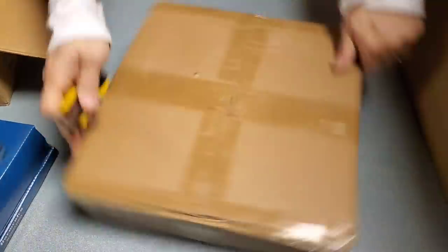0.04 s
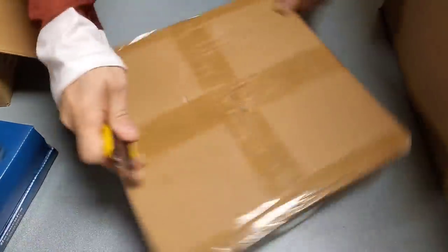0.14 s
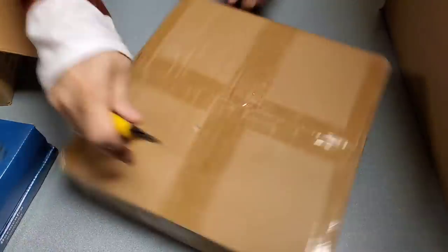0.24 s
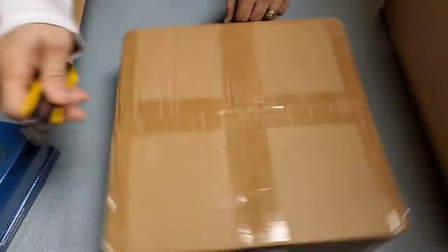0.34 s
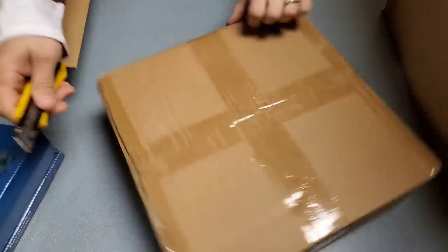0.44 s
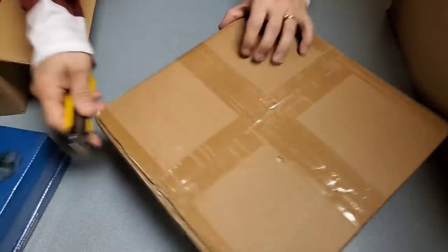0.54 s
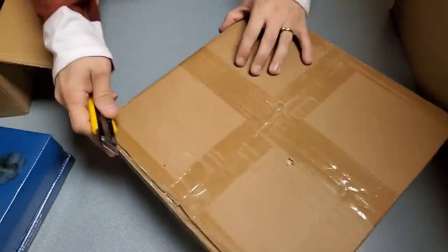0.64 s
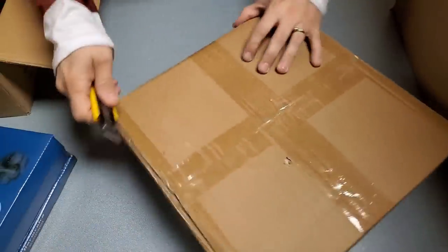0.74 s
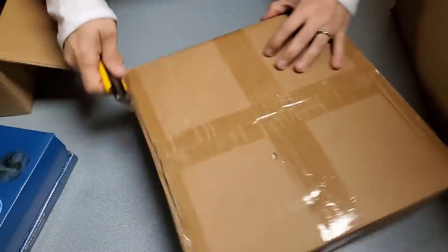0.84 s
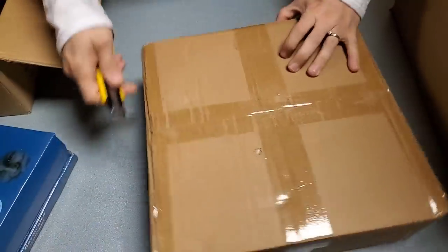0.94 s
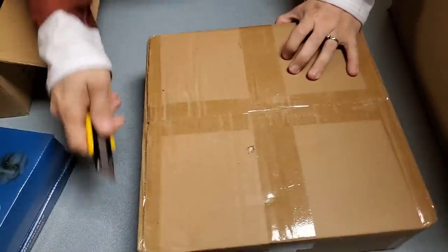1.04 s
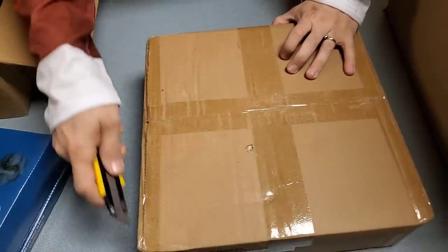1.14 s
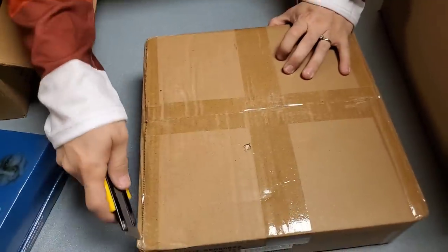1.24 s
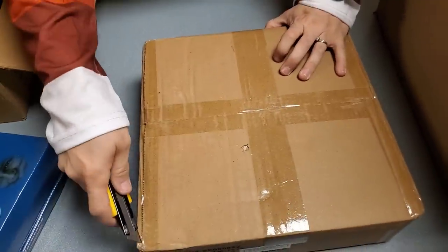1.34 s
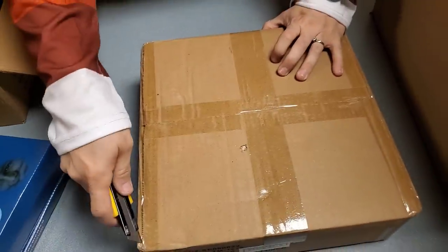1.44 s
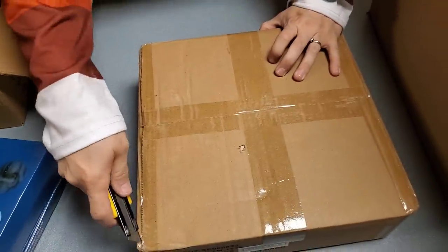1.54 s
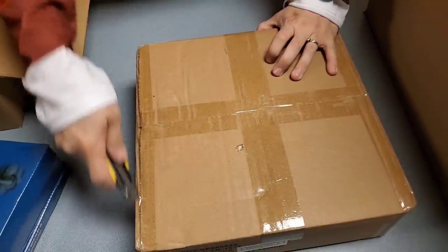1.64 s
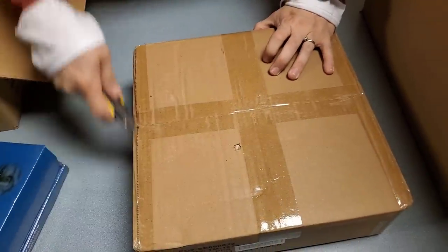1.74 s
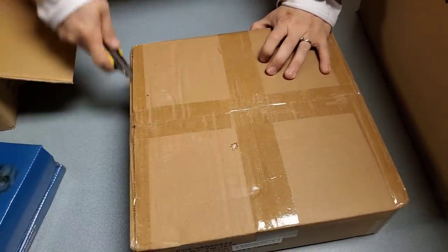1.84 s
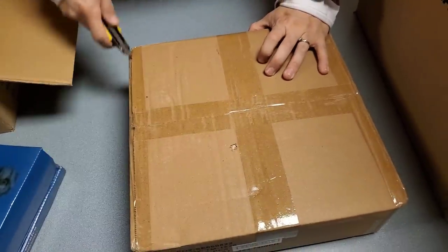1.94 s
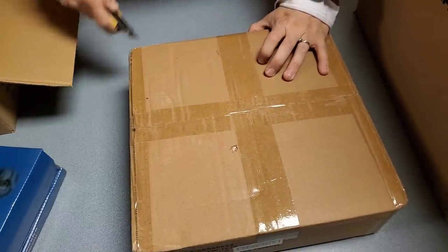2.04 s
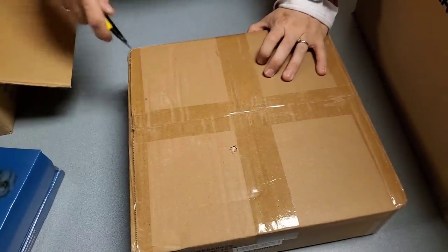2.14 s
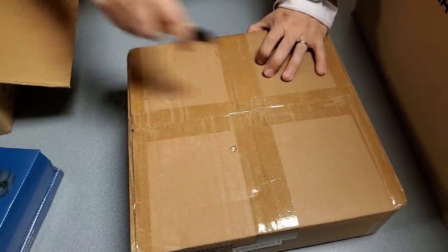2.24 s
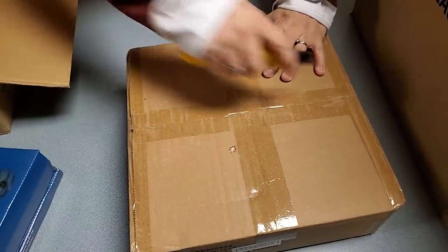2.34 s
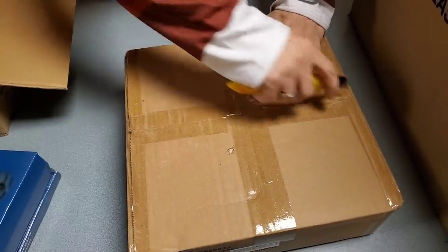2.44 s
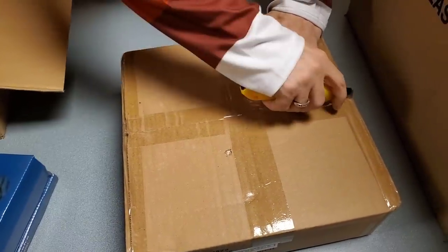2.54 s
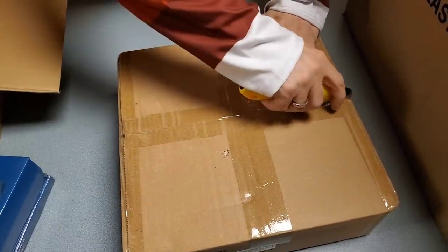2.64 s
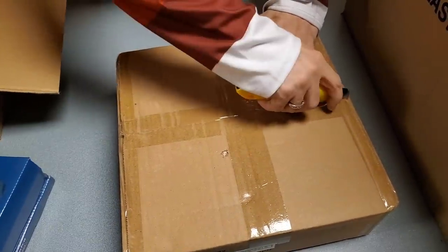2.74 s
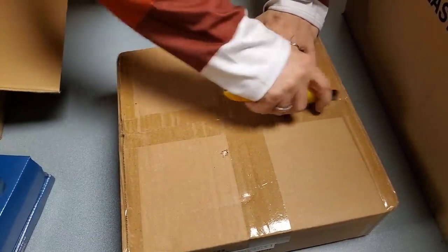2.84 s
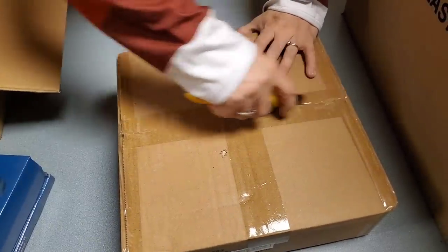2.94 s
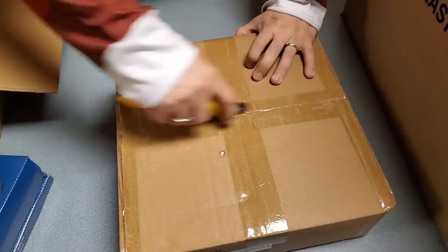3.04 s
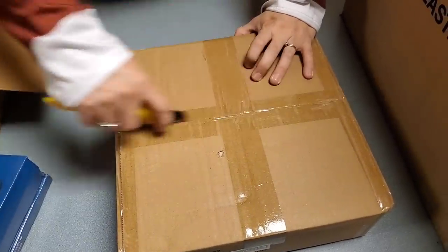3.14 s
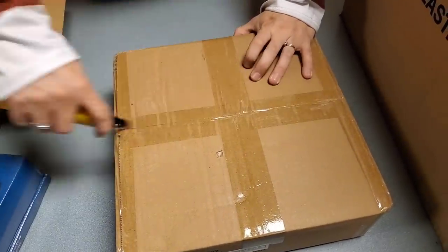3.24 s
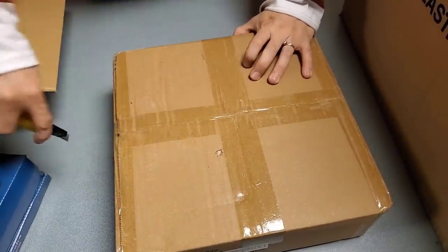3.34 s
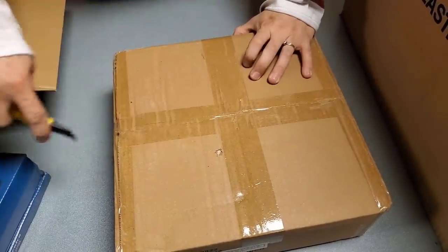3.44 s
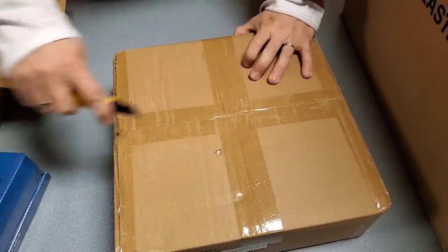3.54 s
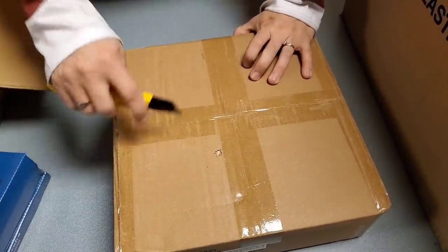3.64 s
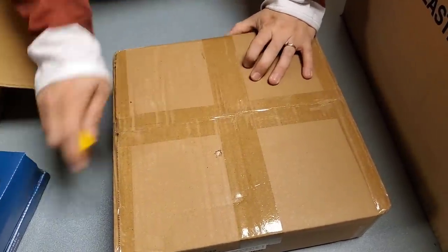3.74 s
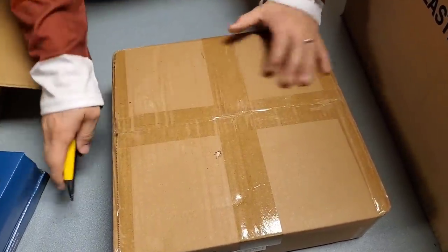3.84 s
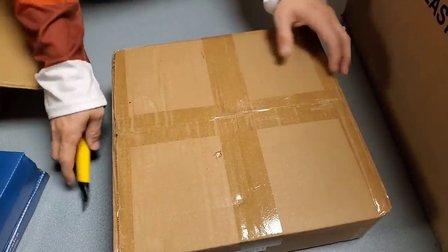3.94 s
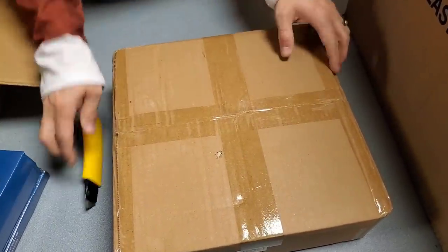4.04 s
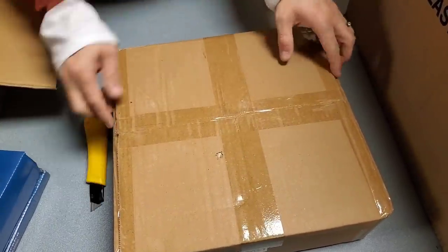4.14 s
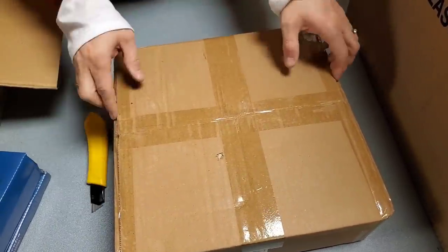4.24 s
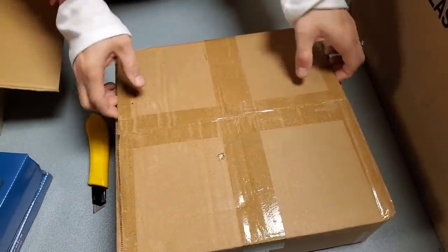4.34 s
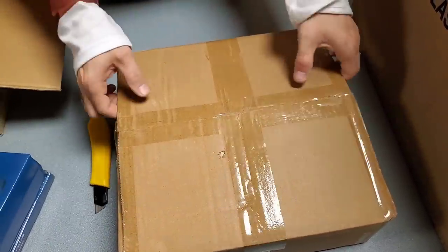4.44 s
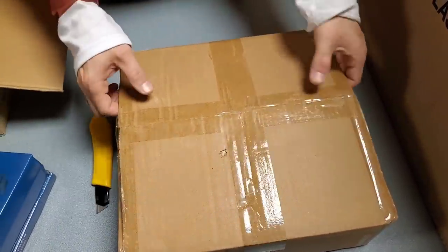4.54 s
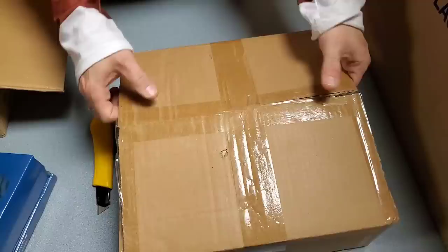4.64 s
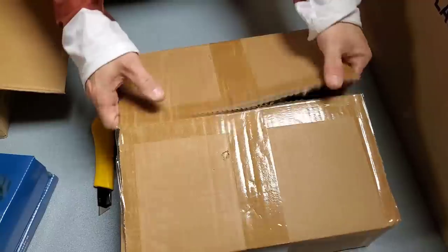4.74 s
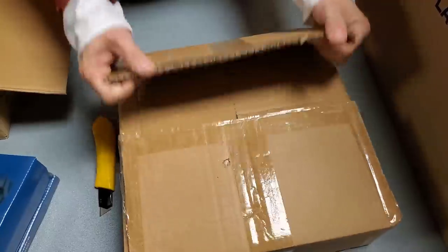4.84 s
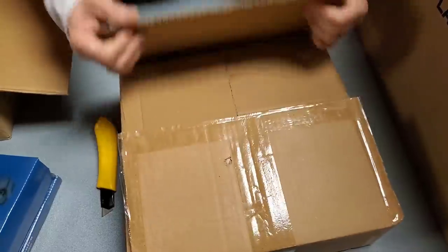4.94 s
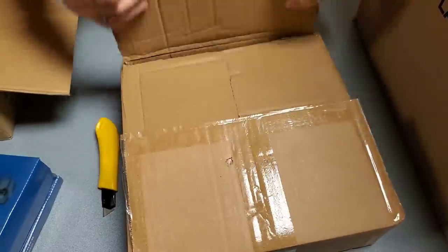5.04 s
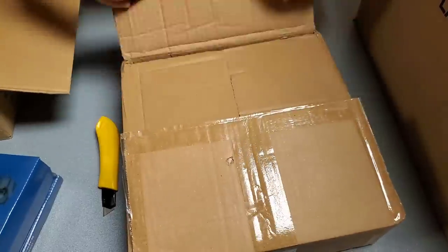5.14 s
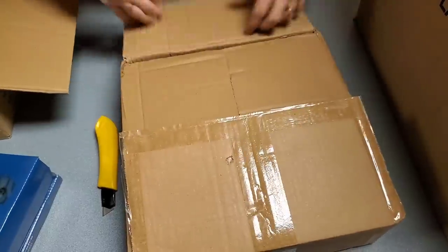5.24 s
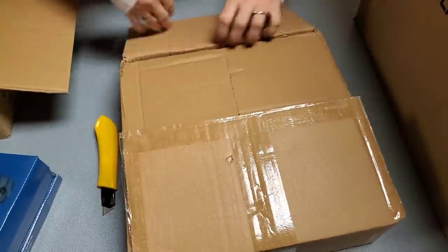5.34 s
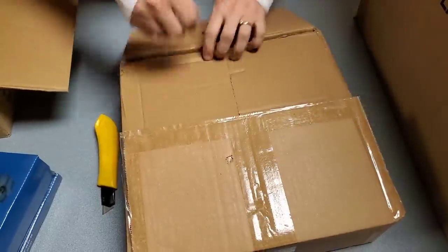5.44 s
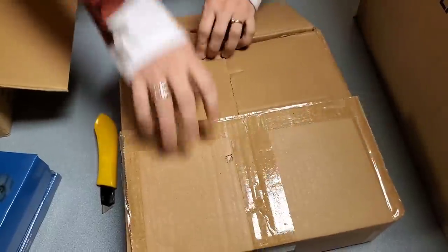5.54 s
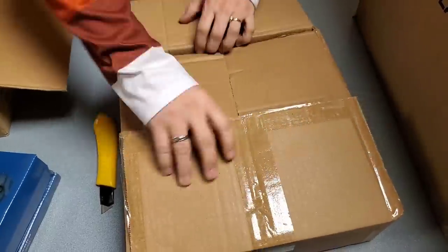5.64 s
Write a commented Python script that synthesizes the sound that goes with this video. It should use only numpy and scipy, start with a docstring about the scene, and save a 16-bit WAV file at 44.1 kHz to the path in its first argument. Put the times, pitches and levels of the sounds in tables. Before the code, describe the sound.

A heavy cardboard box scrapes and bumps across a table, a cutter rasps through tape twice, then tape pops and a flap rips open.

```python
"""Heavy cardboard hisses and bumps over a table, two cuts rasp through tape, tape pops and a flap rips free.
Close by in a small damped room, a box is swung round and pushed: friction noise, shaken walls and rumble.
A cutter slits one edge, then the top seam, where the blade bumps over the flutes: grainy noise and kicked modes.
Fingers pop the last tape in short noise bursts; a flap rips, thuds as damped swings, and is rubbed and folded back."""
import sys
import numpy as np
from scipy import signal
from scipy.fft import rfft, irfft, next_fast_len
from scipy.io import wavfile
from scipy.ndimage import uniform_filter1d

SR = 44100
rng = np.random.default_rng(int(sys.argv[2]) if len(sys.argv) > 2 else 0)


def unload_audio(sound):
    """Save the sound as a 16-bit wav file, at the path given as the first command line argument."""
    columns = np.transpose(np.atleast_2d(sound))
    # keep every value between -1 and 1, then stretch to whole-number steps
    steps = np.round(np.clip(columns, -1, 1) * 32767)
    wavfile.write(sys.argv[1], SR, steps.astype(np.int16))


N = 250047
TIME = np.arange(N) / SR

# modes of the cardboard panels: (frequency [Hz], width [Hz], relative level [dB])
PANEL_MODES = [(111, 88, 0), (241, 61, 1.5), (373, 47, 2.5), (483, 73, -3), (591.6, 60, 2.5),
               (787, 580, -9), (1103, 30, -14.5)]
# modes of the side wall: (frequency [Hz], width [Hz], relative level [dB])
WALL_MODES = [(182, 110, -5), (274, 48, -3), (362, 35, -2), (472, 87, -2.5), (587, 70, 1.5),
              (650, 270, -9.5), (1078, 28, -8.5)]
# higher resonances of the stiff board: (frequency [Hz], width [Hz], boost [dB])
BOARD_PEAKS = [(1110, 50, 3.5), (1210, 140, 3.5), (1600, 50, 2), (1910, 180, 0), (2165, 57, 1.5),
               (2960, 23, 4.5), (3870, 50, -1.5), (4830, 52, 2.5)]


def from_db(db):
    """Decibels to gain."""
    return 10 ** (np.asarray(db) / 20)


def rms_one(x):
    """Scale to unit rms."""
    return x / np.sqrt(np.mean(x ** 2) + 1e-20)


def in_time(rows, fade_s=0.0017):
    """The dB columns of a curve as gains, faded out at its ends."""
    s, *columns = np.transpose(rows)
    gate = np.clip(np.minimum(TIME - s[0], s[-1] - TIME) / fade_s + .5, 0, 1)
    return np.array([gate * from_db(np.interp(TIME, s, c)) for c in columns])


def stroke(full_s, until_s, attack_s, release_s):
    """Gain of one movement: a straight rise, a hold, then a fall of 60 dB per release time."""
    rise = np.clip(1 + (TIME - full_s) / attack_s, 0, 1)
    return rise * from_db(-60 * np.maximum(TIME - until_s, 0) / release_s)


def strokes(rows):
    """Gains of rasp, panel and fizz for a run of movements; a bright one trades panel for fizz."""
    power = 0
    for full_s, until_s, db, attack_s, release_s, bright_db in rows:
        gains = from_db([db, db - bright_db, db + bright_db])
        power = power + np.outer(gains, stroke(full_s, until_s, attack_s, release_s)) ** 2
    return np.sqrt(power)


def colour(x, points, share=1):
    """Shape a sound by a smooth spectrum of (frequency [Hz], level [dB]), its dB scaled by share."""
    size = next_fast_len(x.shape[-1] + 2048)
    hz, db = np.transpose(points)
    bins = np.maximum(np.arange(size // 2 + 1) * SR / size, 1)
    gain = from_db(share * np.interp(np.log(bins), np.log(hz), db))
    return irfft(rfft(x, size) * gain, size)[..., :x.shape[-1]]


def band(x, low_hz, high_hz, order=2):
    """Causal band-pass."""
    edges = [low_hz, min(high_hz, .45 * SR)]
    return signal.sosfilt(signal.butter(order, edges, "band", fs=SR, output="sos"), x)


def resonance(x, hz, width_hz):
    """One resonance with gain 1 on top."""
    r = np.exp(-np.pi * width_hz / SR)
    numerator = np.array([1, 0, -1]) * (1 - r * r) / 2
    denominator = [1, -2 * r * np.cos(2 * np.pi * hz / SR), r * r]
    return signal.lfilter(numerator, denominator, x + 1e-18)


def body(x, modes):
    """Parallel resonances with alternating signs."""
    return sum((-1) ** k * from_db(db) * resonance(x, hz, width) for k, (hz, width, db) in enumerate(modes))


def boosted(x, modes):
    """Narrow peaks and dips on a sound that passes through."""
    for hz, width_hz, db in modes:
        x = x + (from_db(db) - 1) * resonance(x, hz, width_hz)
    return x


def drift(per_s):
    """Smooth chance with rms 1, drawn anew per_s times a second."""
    return rms_one(np.interp(TIME * per_s, np.arange(8192), rng.standard_normal(8192)))


def wander(x, depth, per_s):
    """As the contact point travels, broad parts of the spectrum swell and fade on their own."""
    return x + sum(depth * drift(per_s) * resonance(x, hz, hz / 3) for hz in np.geomspace(900, 13000, 9))


def grains(per_s, spread_db, clump_db, clump_per_s, smooth):
    """Fibres catch and break in clumps over a smooth friction noise; mid and side."""
    sizes = from_db(abs(spread_db) * np.minimum(rng.exponential(1, N), 4))
    clicks = rms_one(sizes * (rng.random(N) < per_s / SR) * rng.standard_normal((2, N)))
    friction = smooth * rng.standard_normal((2, N))
    return rms_one((clicks + friction) * from_db(clump_db * drift(clump_per_s)))


def scrape(force, gains, tone, modes, rasp_db, panel_db, fizz_db, split_hz=5000):
    """Friction sounds directly as rasp and fizz, and shakes the panels."""
    direct = wander(boosted(colour(force, tone), BOARD_PEAKS), depth=0.26, per_s=32)
    rasp = from_db(rasp_db) * rms_one(band(direct, 700, split_hz, order=3))
    fizz = from_db(fizz_db) * rms_one(band(direct, split_hz, SR, order=3))
    panel = from_db(panel_db) * rms_one(body(force, modes))
    return gains[0] * rasp + gains[1] * panel + gains[2] * fizz


def room_quiet(level_db=-73.5):
    """A faint steady noise with a coloured spectrum lies under everything; mid and side."""
    # (frequency [Hz], relative level [dB])
    quiet_tone = [(18, -36), (30, 0), (114, -0.5), (177, -15), (575, -21.5), (1870, -20), (3880, -22),
                  (6720, -20), (7260, -26), (11600, -19.5), (15500, -27)]
    return from_db(level_db) * rms_one(colour(rng.standard_normal((2, N)), quiet_tone))


def slide(speed, tone, hiss_db, rumble_db, wall_db, rumble_follows=1.0):
    """The underside hisses over the table top, the walls resound and the load rumbles."""
    # low spectrum of the moving load: (frequency [Hz], relative level per Hz [dB])
    rumble_tone = [(18, -40), (30, -2.5), (122, -2.5), (184, -6.5), (235, -5), (368, -16.5), (500, -6.5),
                   (650, -34.5), (1100, -120)]
    force = grains(per_s=8300, spread_db=0.5, clump_db=0.75, clump_per_s=55, smooth=1.3)
    hiss = rms_one(wander(colour(force, tone), depth=0.16, per_s=13.77))
    walls = from_db(wall_db) * rms_one(body(force, WALL_MODES))
    rumble = from_db(rumble_db) * rms_one(colour(force, rumble_tone))
    return from_db(hiss_db) * speed * (hiss + walls) + speed ** rumble_follows * rumble


def sliding_box():
    """The box is swung round, then pushed straight: friction follows the speed of each move."""
    # the two moves: (full speed from [s], until [s], attack [s], release [s])
    swing = (0.12, 0.61, 0.21, 0.81)
    shove = (1.005, 1.08, 0.24, 0.74)
    # hiss spectra of the two moves: (frequency [Hz], relative level per Hz [dB])
    turn_hiss = [(240, -23), (400, -12), (673, -9), (1030, -10.5), (1130, -12), (1710, -3.5), (4090, -8.5),
                 (4920, -11.5), (8930, -10), (10400, -11.5), (11200, -5.5), (15500, -18.5)]
    push_hiss = [(120, -43.5), (200, -11.5), (399, -3), (575, 2), (702, -4), (906, -3.5), (1090, -9.5),
                 (1980, 0.5), (5390, -8), (8660, -8.5), (10400, -9.5), (11600, -5), (14400, -13),
                 (15500, -26.5)]
    return (slide(stroke(*swing), turn_hiss, hiss_db=-33.5, rumble_db=-45, wall_db=-26)
            + slide(stroke(*shove), push_hiss, hiss_db=-39.5, rumble_db=-67, wall_db=-30.5))


def thuds(rattle=.25, cycles_to_60_db=10.6, hollow_hz=140, hollow_db=-7.5, hollow_t60_s=0.19):
    """Soft bumps: a few damped panel swings with dull rattle; the hollow box rings on, most after low blows."""
    # soft blows of box and flap: (time [s], level [dB], pitch [Hz])
    blows = [(0.042, -29, 160.3), (.14, -12.5, 164.5), (.16, -5, 398), (0.177, -20, 110), (.244, -12, 371),
             (.246, -16.5, 59.8), (.259, -21, 122), (0.265, -19.5, 527), (.469, -33.5, 70.6),
             (.513, -18.5, 395), (.53, -36.5, 60), (0.758, -34, 84), (2.274, -42, 604), (4.434, -16.5, 504),
             (4.508, -27.5, 266), (4.545, -29.5, 148.4), (4.706, -14, 197.5), (4.809, -13, 228),
             (4.908, -10, 232), (4.9179, -4.5, 305), (4.922, -6.5, 98.7), (5.346, -26.5, 332),
             (5.475, -16.5, 345)]
    size = SR // 2
    t, out = np.arange(size) / SR, np.zeros((2, N + size))
    contact = 1 - np.exp(-t / .001)
    hollow_decay = from_db(hollow_db - 60 * t / hollow_t60_s)
    hollow = hollow_decay * np.sin(2 * np.pi * hollow_hz * t) * contact * [[1], [0]]   # mid only
    for (s, db, hz), white in zip(blows, rng.standard_normal((len(blows), 2, size))):
        swing = np.sin(2 * np.pi * hz * t) * [[1], [0]] + rattle * rms_one(band(white, hz / 2, hz * 2))
        bump = band(swing * contact * from_db(-60 * t * hz / cycles_to_60_db), hz / 2, hz * 2)
        hollow_share = min(1, hollow_hz / hz) ** 2
        start = int(s * SR)
        out[:, start:start + size] += from_db(db) * (bump + hollow_share * hollow)
    return out[:, :N]


def snaps(rows, rise_s=0.00018, low_hz=900, high_hz=5000, panel_db=-7, ring_db=-3, crack_db=-2):
    """Each snap is a short noise burst: a woody body, a crack that rings at its own pitch, a bright edge."""
    size = SR // 8
    t, out = np.arange(size) / SR, np.zeros((2, N + size))
    for (s, db, bright_db, hz, t60), white in zip(rows, rng.standard_normal((len(rows), 2, size))):
        # a brighter snap has less body and more edge
        body_db, edge_db = -8 - 0.94 * bright_db, -7 + bright_db
        decay = from_db(-60 * t / t60)
        burst = white * (1 - np.exp(-t / rise_s)) * decay
        parts = [(band(burst, 130, low_hz), body_db),
                 (body(burst, PANEL_MODES), body_db + panel_db),
                 (band(boosted(burst, BOARD_PEAKS), low_hz, high_hz), crack_db),
                 (resonance(burst, hz, hz / 5), ring_db),
                 (band(burst, high_hz, 12000), edge_db)]
        energy = np.sum(decay ** 2) * 2.32 / size   # a longer burst carries more energy
        start = int(s * SR)
        for part, part_db in parts:
            level = from_db(db + part_db) * np.sqrt(energy)
            out[:, start:start + size] += level * part / part.std(axis=1, keepdims=True)
    return out[:, :N]


def rubbing():
    """Skin, sleeves and the flap brush over the board as grainy friction."""
    # (full force from [s], until [s], level [dB], attack [s], release [s], brightness [dB])
    rubs = [(1.2, 1.3, -58.5, 0.15, 0.74, 6), (1.46, 1.49, -57, 0.014, 0.21, -1.5),
            (1.66, 1.7, -64.5, 0.18, 0.21, -1), (2.175, 2.18, -55, 0.0069, .25, 1),
            (2.28, 2.3, -68.5, .03, 0.29, -2), (2.7, 2.705, -61.5, 0.044, 0.18, 0.5),
            (2.935, 2.95, -59, 0.081, 0.029, 4), (3.83, 3.88, -67, 0.024, 0.14, 0.5),
            (3.955, 3.965, -52, 0.097, 0.42, 4.5), (4.95, 4.99, -57.5, .02, 0.32, -4),
            (5.15, 5.18, -40.5, 0.14, 0.57, 4), (5.44, 5.49, -42.5, .14, 0.67, 2.5),
            (5.6, 5.63, -52.5, 0.071, 0.23, 0)]
    # (frequency [Hz], relative level per Hz [dB])
    rub_tone = [(410, -35), (700, -1), (797, -10.5), (1340, -4), (1830, 2.5), (3820, -4.5), (6100, -4.5),
                (7220, -8.5), (8760, -4), (10200, -7), (11700, 1.5), (15500, -15)]
    force = grains(per_s=2700, spread_db=2.0, clump_db=2.0, clump_per_s=63, smooth=0.98)
    return scrape(force, strokes(rubs), rub_tone, PANEL_MODES, rasp_db=-2.5, panel_db=0.2, fizz_db=-0.74)


def edge_cut(rasp_db=-1.87, panel_db=-3.5, fizz_db=-4.0, wall_fade_db_per_s=10.5, fizz_growth_db_per_s=10.5):
    """The blade runs through tape and paper along the side, thinner as it nears the stiff corner."""
    # force of the blade, as the level of its rasp: (time [s], level [dB])
    edge_force = [(1.72, -45), (1.764, -26.5), (1.88, -21), (2.018, -28.5), (2.052, -23), (2.09, -34.5),
                  (2.1, -25), (2.16, -27), (2.174, -46.5)]
    # (frequency [Hz], relative level per Hz [dB])
    edge_tone = [(410, -31.5), (700, -1.5), (828, -15), (1070, -8), (1480, -7), (1950, -0.5), (3190, -5.5),
                 (7900, -6), (8990, -4.5), (10400, -7), (11500, -1), (15500, -18)]
    force = grains(per_s=6000, spread_db=0.5, clump_db=1.05, clump_per_s=360, smooth=0.96)
    press, = in_time(edge_force)
    past_middle_s = TIME - (edge_force[0][0] + edge_force[-1][0]) / 2
    wall_gain = press * from_db(-wall_fade_db_per_s * past_middle_s)
    fizz_gain = press * from_db(fizz_growth_db_per_s * past_middle_s)
    return scrape(force, [press, wall_gain, fizz_gain], edge_tone, WALL_MODES, rasp_db, panel_db, fizz_db)


def seam_cut(jitter=.05, bump_spread_db=4.0, throb_db=0.5, blade_hz=3400, blade_db=-33, bite_wall_db=-37,
             flutes_db=-20.0):
    """Each flute kicks the top and tightens the rasp, harder with speed; the blade sings as it bites."""
    # speed of the blade along the seam: (time [s], rate [flutes/s])
    flute_rate = [(3.0, 79.5), (3.1, 105), (3.18, 126.6), (3.24, 131.7), (3.34, 123), (3.45, 86.3)]
    # whole stroke, first bite, and blade sunk in: (full from [s], until [s], attack [s], release [s])
    seam_stroke = (3.02, 3.428, .065, 0.084)
    bite = (3.02, 3.04, 0.033, 0.41)
    sink = (3.1, 3.434, 0.11, 0.054)
    # modes of the top, held down along its seam: (frequency [Hz], width [Hz], relative level [dB])
    top_modes = [(133, 70, -5), (236, 65, 3), (390.3, 16, -5.5), (590, 26, -23.5)]
    # (frequency [Hz], relative level per Hz [dB])
    seam_tone = [(410, -15.5), (700, 1.5), (919, -24), (1020, -1.5), (1630, -1), (2770, 1.5), (3270, -6.5),
                 (3580, -3), (5360, -13.5), (10400, -16.5), (11700, -8), (15500, -27.5)]

    rate = np.interp(TIME, *np.transpose(flute_rate))
    speed, press = rate / rate.max(), stroke(*seam_stroke)
    turns = np.cumsum(rate * (1 + jitter * drift(110))) / SR   # flutes passed so far

    kicks = np.diff(np.floor(turns), prepend=0) * from_db(bump_spread_db * drift(120))
    shaking = kicks * [[1], [0]] + 0.026 * rng.standard_normal((2, N))
    drum = band(body(shaking, top_modes), low_hz=75.7, high_hz=3100)
    drum = drum / np.sqrt(uniform_filter1d(drum[0] ** 2, size=1500) + 1e-12)   # the hand keeps an even pressure
    flutes = from_db(flutes_db) * stroke(*sink) * speed ** 5.4 * drum

    force = grains(per_s=2200, spread_db=2.0, clump_db=1.0, clump_per_s=120, smooth=1.0)
    force = force * from_db(throb_db * np.cos(2 * np.pi * turns))
    # rasp, panel and fizz: dB gained per dB of blade speed
    gains = [press * speed ** follows for follows in (1.76, 2.9, 0.2)]
    rasp = scrape(force, gains, seam_tone, PANEL_MODES, rasp_db=-28, panel_db=-26.5, fizz_db=-32)

    singing = from_db(blade_db) * rms_one(resonance(force, blade_hz, width_hz=800))
    bitten_wall = from_db(bite_wall_db) * rms_one(body(force, WALL_MODES))
    return rasp + stroke(*bite) * (singing + bitten_wall) + flutes


def tape():
    """Strained tape crackles against the side wall as fingers pull, and rips in dense bursts."""
    # fingers pull, tape rips: (full force from [s], until [s], level [dB], attack [s], release [s],
    # brightness [dB])
    pulls = [(4.207, 4.33, -42, .004, 0.66, -3.5), (4.283, 4.29, -31.5, 0.011, 0.28, 0),
             (4.413, 4.432, -34, .004, 0.1, 4.5), (4.51, 4.515, -38.5, 0.042, 0.22, -3.5),
             (4.536, 4.556, -38, 0.0078, 0.21, 2), (4.64, 4.69, -44, 0.022, 0.33, 1.5),
             (4.707, 4.714, -28, 0.0059, 0.12, 2), (4.78, 4.8, -46, .06, .1, 2)]
    rips = [(4.147, 4.155, -29, 0.00263, 0.25, 2), (4.81, 4.822, -24.5, 0.012, 0.42, 2.5),
            (4.897, 4.922, -19, 0.01, 0.041, 1.5)]
    # (frequency [Hz], relative level per Hz [dB])
    tear_tone = [(410, -20), (700, -1), (968, -14), (1160, -4), (1410, -2.5), (2280, -0.5), (3680, -7),
                 (8760, -12.5), (9850, -15.5), (12000, -9), (14300, -18.5), (15500, -27)]
    crackle = grains(per_s=1200, spread_db=1.0, clump_db=3.5, clump_per_s=220, smooth=0.67)
    tearing = grains(per_s=3600, spread_db=1.2, clump_db=2.0, clump_per_s=200, smooth=0.57)
    return (scrape(crackle, strokes(pulls), tear_tone, WALL_MODES, rasp_db=-0.5, panel_db=0.3, fizz_db=0.0)
            + scrape(tearing, strokes(rips), tear_tone, PANEL_MODES, rasp_db=0.7, panel_db=3.0, fizz_db=-2.0))


def place(mid_side, pan_db):
    """Mid and side to left and right, leaning left by pan_db."""
    # stereo width: (frequency [Hz], side minus mid [dB])
    side_width = [(60, -10), (130, -28.5), (260, -19), (520, -10), (1000, -5), (2000, -0.5), (12000, 0)]
    mid, side = mid_side[0], colour(mid_side[1], side_width)
    return np.array([mid + side, mid - side]) * from_db(np.array([[pan_db], [-pan_db]]) / 2)


def room(x, early_db=-12, early_t60=0.064, late_db=-19, late_t60=0.14):
    """Quick reflections off table and nearby boxes, then a short faint tail, as decaying noise."""
    t = np.arange(SR // 2) / SR
    answer = 0
    for db, t60 in [(early_db, early_t60), (late_db, late_t60)]:
        noise = band(rng.standard_normal((2, len(t))), 200, 14000, order=1)
        echoes = place(noise, pan_db=4.5) * from_db(-60 * t / t60) * (t > .002)
        answer = answer + from_db(db) * rms_one(echoes) / np.sqrt(len(t))
    return x + signal.fftconvolve(x, answer, axes=1)[:, :N]


def scene():
    """All the handling in the room, most parts placed a little left and the cutter ticks a little right, then
    tilted right above a few hundred hertz."""
    # cutter ticks and knocks on the board, then tape and flap snaps:
    # (time [s], level [dB], brightness [dB], ring [Hz], t60 [s])
    tick_rows = [(.243, -34, -9.5, 1360, 0.12), (.8241, -45.5, -13, 3240, 0.012),
                 (1.3328, -46, -7, 1080, 0.013), (1.429, -42.5, 3, 3920, 0.06),
                 (1.4455, -35, 7, 5850, .019), (1.4789, -41, 4.5, 2260, .01),
                 (1.4925, -43, -7.5, 2170, 0.014), (1.6283, -48.5, -3, 1920, 0.017),
                 (1.6544, -49, 3.5, 6350, .014), (1.7112, -37.5, 2, 6410, 0.026),
                 (2.1896, -35, 3.5, 5370, 0.028), (2.245, -44, -1.5, 4160, 0.0088),
                 (2.42, -63.5, 11.5, 6400, .014), (2.6965, -40.5, 7, 4500, 0.017),
                 (2.904, -53.5, -2, 1970, 0.017), (2.932, -41.5, 11, 2060, 0.012),
                 (2.9581, -20.5, -3.5, 1950, 0.015), (3.1031, -22, 2.5, 5037, 0.0097),
                 (3.914, -43, -0.5, 5370, 0.016), (3.9536, -30.5, 7.5, 4930, 0.019)]
    snap_rows = [(4.1305, -26.5, 3, 5460, 0.034), (4.1428, -15, 9, 1700, 0.013),
                 (4.2041, -22.5, -4.5, 1130, 0.015), (4.2344, -23, 1, 1160, 0.011),
                 (4.2497, -29.5, 8.5, 1130, 0.032), (4.2806, -18.5, -3, 1710, 0.011),
                 (4.3147, -29.5, 1, 4870, 0.031), (4.341, -29.5, -10, 1890, 0.013),
                 (4.4119, -24.5, -10, 2190, 0.024), (4.4281, -26.5, -7, 2520, 0.013),
                 (4.4367, -25, -12, 2360, 0.015), (4.459, -34, 11, 2980, .013),
                 (4.4793, -32.5, 5, 2370, 0.02), (4.534, -39, 8, 2160, .014), (4.547, -35, 3, 2200, 0.073),
                 (4.6341, -37, -4, 2140, 0.013), (4.7043, -12, -4, 1650, 0.017),
                 (4.7322, -33, 3, 6850, 0.015), (4.8099, -25.5, -4, 3200, .015),
                 (4.8197, -18, -3, 6760, .035), (4.901, -18, 1, 6850, 0.02),
                 (5.1052, -34, -4.5, 2060, 0.027), (5.1388, -31.5, -3.5, 5900, 0.032),
                 (5.188, -36.5, -4, 3730, 0.017), (5.244, -37, 13.5, 6100, 0.0074),
                 (5.2909, -41.5, 8, 6000, .012), (5.474, -34.5, 1, 1100, 0.012)]
    # tilt between the ears, applied in part: (frequency [Hz], left minus right [dB])
    ear_balance = [(60, -10.5), (130, 0), (500, -3.5), (2000, -5), (5000, -5), (12000, -7)]
    near = (place(sliding_box(), pan_db=0.4) + place(thuds(), pan_db=2.5)
            + place(snaps(tick_rows), pan_db=-1.0) + place(tape() + rubbing(), pan_db=0.74)
            + place(edge_cut(), pan_db=1.0) + place(seam_cut(), pan_db=0.1)
            + place(snaps(snap_rows), pan_db=2.1))
    left, right = from_db(-0.49) * room(near) + place(room_quiet(), pan_db=5.0)
    return np.array([colour(left, ear_balance, share=0.48), colour(right, ear_balance, share=-0.44)])


def record(dry, bass_cut_hz=30, cutoff_hz=15600):
    """The microphone ports thin the deep bass and ripple the treble, peaks are rounded, the top is cut."""
    # (frequency [Hz], width [Hz], boost [dB])
    port_ripple = [(8740, 570, 2.5), (10520, 710, -4.5), (12600, 1400, -1)]
    bass_cut = signal.butter(2, bass_cut_hz, "high", fs=SR, output="sos")
    heard = signal.sosfilt(bass_cut, boosted(dry, port_ripple))
    rounded = .85 * np.tanh(heard / .85)
    return signal.sosfilt(signal.ellip(10, .2, 100, cutoff_hz, fs=SR, output="sos"), rounded)


dry = scene()
out = record(dry)
unload_audio(out)
```